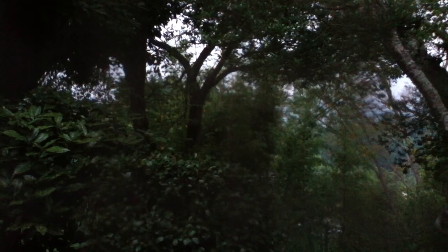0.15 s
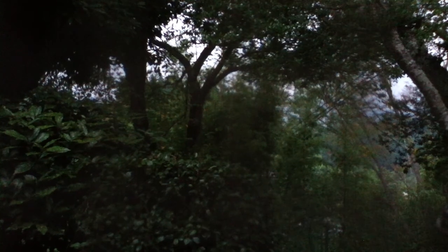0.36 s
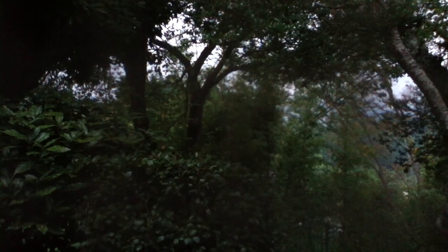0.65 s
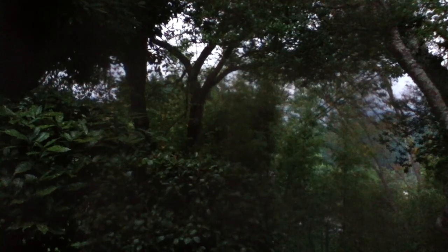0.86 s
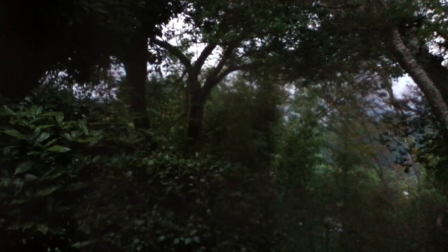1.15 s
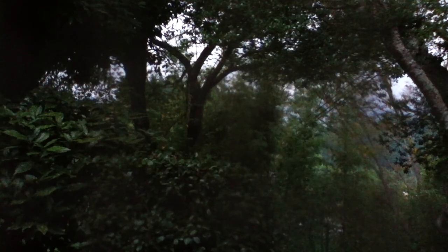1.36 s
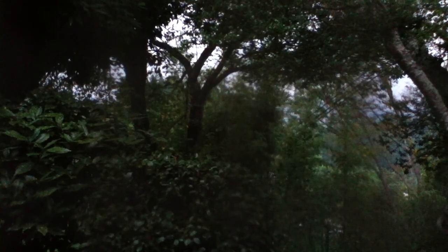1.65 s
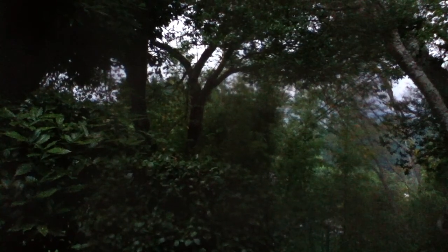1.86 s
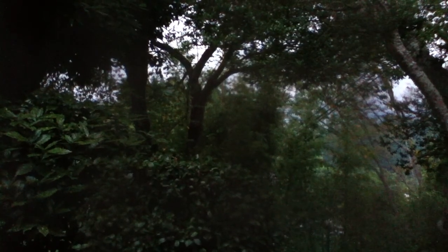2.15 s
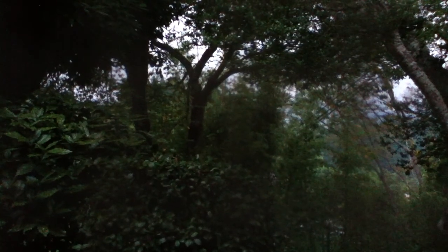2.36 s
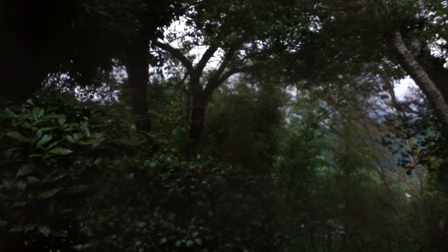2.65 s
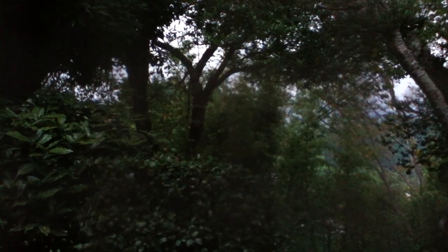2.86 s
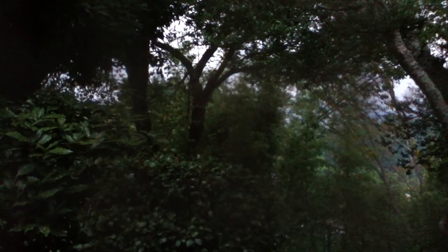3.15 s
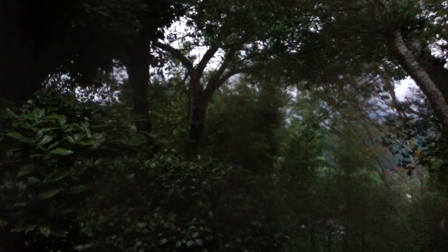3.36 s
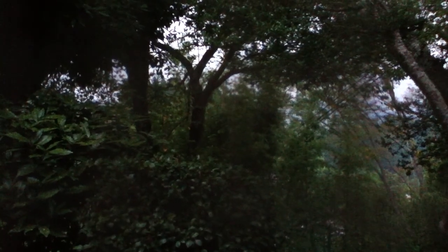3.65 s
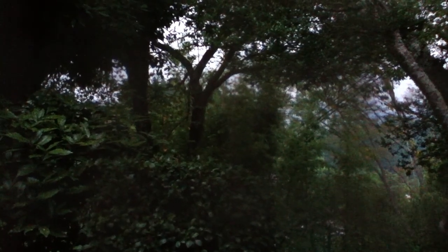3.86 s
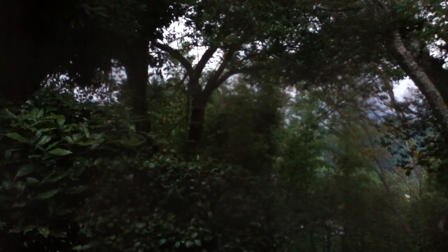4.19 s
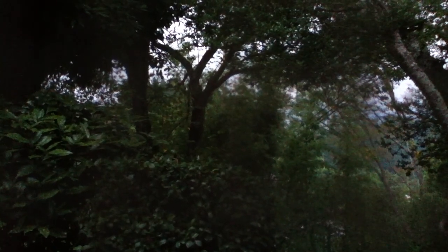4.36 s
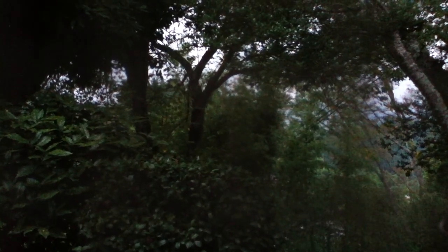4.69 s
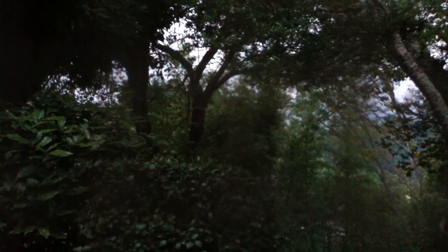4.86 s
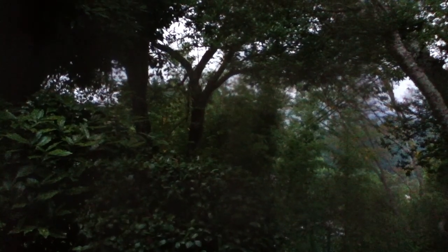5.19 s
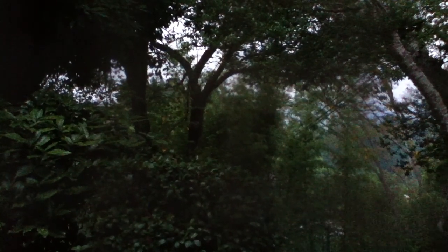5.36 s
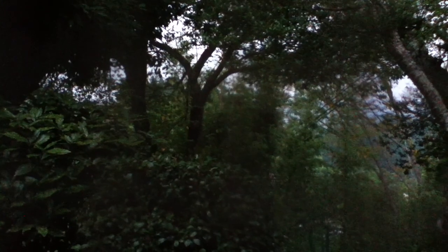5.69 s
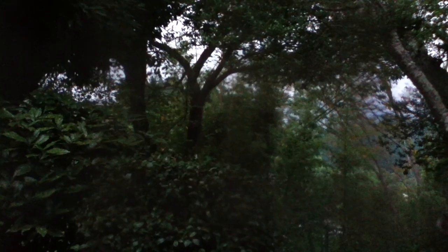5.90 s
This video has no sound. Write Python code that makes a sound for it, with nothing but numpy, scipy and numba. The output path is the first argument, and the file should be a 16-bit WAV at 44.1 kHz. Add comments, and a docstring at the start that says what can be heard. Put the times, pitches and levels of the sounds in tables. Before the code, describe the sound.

A dense, shrill insect chorus fills a shady mountain forest from 0 to 6 seconds without a break. Foremost is one near cicada, a piercing, dry metallic buzz centred near 8 kHz, made of about 407 regular clicks per second. Its tremor is slower until about 1.7 s, then quickens to a finer roughness, with another slight change of colour at 2.9 s. A crowd of similar cicadas, blurred by leaves, dips around 2.7 to 3.5 s, flickers in short swells and strengthens again at the end. Below, a far chorus holds near 4.2 kHz; nearer singers rasp briefly at 0.25, 0.7 and 1.3 s and around 2 s, then swell and climb toward 5.5 kHz. Crickets trill faintly near 2 kHz, with thin throbbing tones and a weak pulsing buzz. Two barely audible low calls pass at 4.3 and 5.4 s. Tiny chirps near 6 kHz come from 5.1 to 5.8 s. Quiet forest hush lies beneath.

```python
"""Cicada forest

One near cicada clicks about 407 times a second, its click timing shaken by a slower tremor. A crowd of its kind
shrills behind it as blurred click trains; a lower chorus of clickers climbs in pitch through moving resonances.
Crickets trill near 2 kHz as gated tones, thin insect tones throb above them, brief chirps sound near 6 kHz, a far
buzz throbs slowly and two dim low calls pass, over filtered noise for the hush of the forest."""
import sys
import numpy as np
from scipy import signal
from scipy.fft import rfft, irfft, next_fast_len
from scipy.io import wavfile
from scipy.ndimage import uniform_filter1d
from numba import njit

SR = 44100
rng = np.random.default_rng(int(sys.argv[2]) if len(sys.argv) > 2 else 0)


def wav_out(sig):
    """Save sig, one row per channel (or a flat mono array), as 16-bit PCM at SR to the path in sys.argv[1]."""
    wavfile.write(sys.argv[1], SR, np.round(np.clip(np.atleast_2d(sig).T, -1, 1) * 32767).astype(np.int16))


N = 265923
T = np.arange(N) / SR
SIZE = next_fast_len(N)
BINS_HZ = np.fft.rfftfreq(SIZE, 1 / SR)


def undb(db):
    """Decibels to amplitude ratio."""
    return 10 ** (np.asarray(db) / 20)


def unit(x):
    """Scale to rms 1."""
    return x / np.sqrt(np.mean(x ** 2))


def curves(table):
    """Interpolate each column over time; the first column is seconds."""
    s, *columns = np.vstack(table).T
    return [np.interp(T, s, c) for c in columns]


def walk(rate):
    """Random levels held 1 / rate s and slewed twice; spread 1."""
    hold = int(SR / rate)
    steps = np.repeat(rng.standard_normal(N // hold + 1), hold)
    slewed = uniform_filter1d(uniform_filter1d(steps, hold), hold)
    return unit(slewed)[:N]


def steady(x, span_s):
    """Even out swells slower than the span."""
    return x / np.sqrt(uniform_filter1d(x ** 2, int(span_s * SR)))


def bell(centre_s, half_s):
    """Gaussian swell, down to 1/e at half_s from its centre."""
    return np.exp(-((T - centre_s) / half_s) ** 2)


def colour(x, table, paths=1):
    """Filter by (Hz, dB) points, interpolated in log frequency; rms 1."""
    hz, db = np.transpose(table)
    gain = undb(np.interp(np.log(BINS_HZ + 1), np.log(hz), db, left=-60))
    return unit(irfft(rfft(x, SIZE) * gain * paths, SIZE)[:N])


@njit
def svf(x, hz, width):
    """State-variable band-pass with a moving centre, gain 1 there."""
    y, band, low = np.empty(len(x)), 0., 0.
    for i in range(len(x)):
        g, k = np.tan(np.pi * hz[i] / SR), width / hz[i]
        v = (band + g * (x[i] - low)) / (1 + g * (g + k))
        band, low, y[i] = 2 * v - band, low + 2 * g * v, k * v
    return y


def ring(x, hz, width_hz):
    """A resonance applied twice, for steep flanks."""
    hz = hz + np.zeros(N)
    return svf(svf(x, hz, float(width_hz)), hz, float(width_hz))


def clicks(cycles, jitter_us, scatter_db, shift_s=np.zeros(N)):
    """One sharp click at each whole number of the running cycle count, placed between samples."""
    at_s = np.interp(np.arange(1, int(cycles[-1])), cycles, T)
    chance = rng.standard_normal((len(at_s), 2))
    at = (at_s + np.interp(at_s, T, shift_s) + jitter_us * chance[:, 0] / 10 ** 6) * SR
    taps = np.floor(at)[:, None] + np.arange(-7, 9)
    off = taps - at[:, None]
    window = 1 + np.cos(np.pi * off / 8)
    shape = np.sinc(off) * window * undb(scatter_db * chance[:, 1:])
    return np.bincount(np.clip(taps, 0, N - 1).astype(int).ravel(), shape.ravel(), N)


def foliage(x, t60_s):
    """Leaves scatter a far sound into a short noisy tail."""
    t = T[:SR // 4]
    tail = rng.standard_normal(len(t)) * np.exp(-np.log(1000) * t / t60_s)
    return signal.fftconvolve(x, tail)[:N]


def rattle(rate_hz, jitter_us, count):
    """Slower, rougher clickers heard through the leaves; they fade in and out but the sum holds steady."""
    out = 0
    for spread in rng.uniform(-1, 1, count):
        rate = rate_hz * (1 + .1 * spread + .003 * walk(2))
        train = clicks(np.cumsum(rate) / SR, jitter_us, scatter_db=3.5)
        out = out + foliage(train, t60_s=0.064) * undb(3 * walk(2.5))
    return steady(out, 0.13)


def trills(centre_hz, spread_hz, count):
    """Each wing stroke is a short tone; many trills overlap."""
    out = 0
    for pitch, (pace, start) in zip(np.linspace(-1, 1, count), rng.uniform(-1, 1, (count, 2))):
        stroke = np.cumsum(36 * (1 + .45 * pace + 0.0453 * walk(3))) / SR + start
        gate = np.maximum(np.sin(2 * np.pi * stroke) + .9, 0)
        hz = centre_hz + spread_hz * pitch + 14 * walk(9)
        level = undb(2.2 * walk(7.7) - 4.0 * pitch ** 2)
        out = out + gate * level * np.sin(2 * np.pi * np.cumsum(hz) / SR)
    return steady(out, 0.19)


# Spectrum of the forest hush. Each row: frequency in Hz, relative density in dB per Hz.
HUSH_SPECTRUM = [(25, -14), (50, -5), (110, 1.5), (300, -2.5), (700, -10), (1500, -10.5), (2400, -7),
                 (3200, -10), (6000, -2.5), (12000, -21)]
HUSH_DB = -53


def hush():
    """Distant air and leaves: smooth noise, strongest in the bass."""
    return colour(rng.standard_normal(N), HUSH_SPECTRUM) * undb(HUSH_DB)


# Faint low calls. Each row: centre in seconds, peak level in dB, resonance in Hz.
LOW_CALL_ROWS = [(4.28, -66.5, 1220), (5.42, -67.5, 1130)]
THROB_FIRST_S, THROB_PERIOD_S, THROB_HALF_S, THROB_DB = 0.59, .725, 0.049, -58.5


def faint_voices():
    """A far insect buzzes near 3 kHz in slow regular throbs; two dim low calls ring from the same clicks."""
    # time from the nearest throb
    from_throb_s = (T - THROB_FIRST_S + THROB_PERIOD_S / 2) % THROB_PERIOD_S - THROB_PERIOD_S / 2
    buzz = rattle(120, jitter_us=120, count=3)
    out = unit(ring(buzz, 3000, 1600)) * np.exp(-(from_throb_s / THROB_HALF_S) ** 2) * undb(THROB_DB)
    for s, db, hz in LOW_CALL_ROWS:
        out = out + unit(ring(buzz, hz, 700)) * bell(s, 0.2) * undb(db)
    return out


# Spectrum of the far chorus. Each row: frequency in Hz, relative density in dB per Hz.
FAR_CHORUS_SPECTRUM = [(2200, -28), (3000, -15.5), (3550, -8.5), (3900, -3.5), (4150, 0.5), (4700, -2),
                       (5200, -7), (5700, -12.5), (7000, -30.5)]
# Climbing singers. Each row: time in seconds, level in dB, reference pitch of their resonances in Hz.
CLIMB_COURSE = [(0, -62, 4800), (1.0, -58, 4800), (1.8, -53, 4760), (2.3, -46, 4880), (2.9, -43.5, 5040),
                (3.6, -43.5, 5260), (4.3, -42, 5280), (4.7, -39.5, 5470), (6.03, -37.5, 5500)]
# Fixed narrow resonances that stay put while the singers climb. Each row: frequency in Hz, strength in dB.
FIXED_RESONANCES = [(4405, 6), (4543, 4), (4703, 6), (4862, 5), (4906, 4), (4970, 6), (5042, 5), (5114, 5),
                    (5162, 3), (5211, 5), (5288, 6), (5355, 4), (5435, 4), (5470, 5), (5582, 4), (5925, 6)]
# Early rasps of those singers. Each row: centre in seconds, peak level in dB, half length in seconds.
RASP_ROWS = [(0.25, -44, 0.041), (0.72, -41, .06), (1.304, -45.5, 0.19), (1.927, -50, 0.1),
             (2.147, -47, 0.09)]
# Lead singer among them. Each row: time in seconds, rate in clicks per second.
LEAD_RATE = [(0, 180), (3.0, 190), (4.0, 185), (4.7, 143), (5.3, 150), (6.03, 165)]
FAR_CHORUS_DB, RESONANCE_WIDTH_HZ = -45, 16
LEAD_DB, OVERTONE_DB = -3, -17  # lead against the other singers, overtone against the climbing band


def low_chorus():
    """A far chorus holds near 4.2 kHz; nearer singers rasp a few times, then swell as their resonance climbs."""
    far = colour(rattle(260, jitter_us=59, count=9), FAR_CHORUS_SPECTRUM)

    lead_cycles = np.cumsum(curves(LEAD_RATE)[0]) / SR
    lead = foliage(clicks(lead_cycles, jitter_us=45, scatter_db=1.5), t60_s=.012)
    singers = rattle(170, jitter_us=35, count=8) + unit(lead) * undb(LEAD_DB)

    climb_db, hz = curves(CLIMB_COURSE)
    # two bands in opposite sign, the lower one stronger
    climb = unit(ring(singers, hz + 120, 900)) - unit(ring(singers, hz - 480, 1050)) * undb(3.5)
    narrow = 1 + sum(undb(db) / (1 + 2j * (BINS_HZ - f) / RESONANCE_WIDTH_HZ) for f, db in FIXED_RESONANCES)
    climb = irfft(rfft(climb, SIZE) * narrow, SIZE)[:N]
    overtone = unit(ring(singers, 2.0 * hz, 3000)) * undb(OVERTONE_DB)

    rasp_level = sum(undb(db) * bell(s, half_s) for s, db, half_s in RASP_ROWS)
    rasps = unit(ring(singers, 4800, 1760)) * rasp_level
    return unit(far) * undb(FAR_CHORUS_DB) + (unit(climb) + overtone) * undb(climb_db) + rasps


# Crickets near 2.1 kHz. Each row: time in seconds, level in dB.
CRICKET_LEVEL = [(0, -54), (1.2, -55), (2.4, -57), (4.5, -55), (6.03, -55)]
CRICKET_SURGE_DB, CRICKET_SURGES_PER_S = 1.15, 8.8  # spread and rate of the random level
DEEP_CRICKETS_DB = -12.5  # against the others


def crickets():
    """A field of crickets near 2.1 kHz that surges together, and fewer, deeper ones just below."""
    main = trills(2105, 95, count=18)
    deep = trills(1870, 140, count=9)
    level_db = curves(CRICKET_LEVEL)[0] + CRICKET_SURGE_DB * walk(CRICKET_SURGES_PER_S)
    return (main + deep * undb(DEEP_CRICKETS_DB)) * undb(level_db)


# Thin high tones, long or brief. Each row: start in seconds, end in seconds, pitch in Hz,
# level before the throb in dB.
STRAND_ROWS = [(0, 2.0, 4120, -57), (1.15, 1.45, 5040, -58.5), (2.6, 6.2, 4700, -56), (4.3, 6.2, 5460, -54),
               (2.9, 3.9, 3480, -65), (2.24, 2.42, 3240, -63), (3.38, 3.5, 3200, -65),
               (4.04, 4.16, 3180, -66), (4.76, 4.9, 3220, -65), (5.8, 6.1, 3520, -63),
               (1.6, 2.4, 2730, -72), (1.95, 2.2, 4620, -55), (.3, .55, 3500, -62), (1.1, 1.5, 2620, -70),
               (.9, 1.4, 3680, -61), (1.9, 2.4, 2580, -71), (2.65, 2.95, 2520, -71), (.3, .8, 5400, -60),
               (5.6, 6.0, 3150, -67)]


def strands():
    """Thin insect tones, each wavering in pitch, throbbing about 13 times a second and fading in and out."""
    out = 0
    for start, end, hz, db in STRAND_ROWS:
        fade = np.clip(np.minimum(T - start, end - T) / 0.016, 0, 1)
        throb_cycles = np.cumsum(13 * (1 + 0.247 * walk(4))) / SR
        throb = np.maximum(np.sin(2 * np.pi * throb_cycles) + 1.8, 0) * .8 * undb(1.5 * walk(9))
        tone = np.sin(2 * np.pi * np.cumsum(hz + 18 * walk(40)) / SR)
        out = out + undb(db) * fade * throb * tone
    return out


# Short high chirps. Each row: centre in seconds, peak level before the buzz in dB, pitch in Hz.
CHIRP_ROWS = [(5.1342, -45, 5800), (5.3996, -47, 5970), (5.5588, -42, 5900), (5.7199, -43, 5950),
              (5.8122, -45, 5940)]


def chirps():
    """A lone insect adds brief notes near 6 kHz, made buzzing by a 160 Hz level modulation."""
    out = 0
    for s, db, hz in CHIRP_ROWS:
        t = T - s
        buzz = 1 + .5 * np.cos(2 * np.pi * 160 * t)
        out = out + undb(db) * bell(s, .018) * np.sin(2 * np.pi * hz * t) * buzz
    return out


# Crowd. Each row: time in seconds, level in dB, how far its band has narrowed from 0 to 1.
CROWD_COURSE = [(0, -27, 0.7), (1.68, -30, 0.34), (1.8, -30.5, 0), (2.7, -33.5, 0), (3.5, -33.5, 0.8),
                (5.2, -32.5, 0.6), (5.4, -31.5, 0.3), (6.03, -28.5, 0.8)]
# Narrowed band against the broad one. Each row: frequency in Hz, gain in dB.
CROWD_NARROWING = [(4500, -3), (6600, -3), (7200, -5), (7500, 0), (8400, 0), (8700, -6), (9800, -6),
                   (11000, -2), (16000, -2)]
# Brief swells of the crowd. Each row: centre in seconds, rise in dB.
CROWD_SURGES = [(2.25, 2), (2.95, 2), (3.38, 3), (3.64, 3), (3.77, 2.5), (4.05, 4.5), (4.4, 3), (4.62, 3),
                (4.89, 3), (5.1, 3.5), (5.93, 2)]
# Tymbal and air sac heard from afar. Each row: frequency in Hz, relative density in dB per Hz.
FAR_TYMBAL_SPECTRUM = [(4500, -84), (5700, -31), (6300, -15.5), (7000, -12.5), (7400, -1.5), (8050, 0),
                       (8600, 0.5), (9200, -5.5), (10200, -10.5), (11000, -24), (13000, -34), (16000, -100)]
SURGE_HALF_S = .05


def crowd(count=10):
    """Farther cicadas of the same kind, each at its own drifting rate, blurred by the leaves."""
    out = 0
    for spread in rng.uniform(-1, 1, count):
        rate = 414 * (1 + .006 * spread + .002 * walk(4))
        train = clicks(np.cumsum(rate) / SR, jitter_us=19.6, scatter_db=0.5)
        out = out + foliage(train, t60_s=0.024) * undb(0.62 * walk(2.1))
    level_db, core = curves(CROWD_COURSE)
    surge_db = sum(db * bell(s, SURGE_HALF_S) for s, db in CROWD_SURGES)
    broad = colour(out, FAR_TYMBAL_SPECTRUM)
    mixed = (1 - core) * broad + core * colour(broad, CROWD_NARROWING)
    return steady(mixed, 0.09) * undb(level_db + surge_db)


# Near cicada rhythm. Each row: time in seconds, rate in clicks per second, tremor in Hz.
NEAR_RHYTHM = [(0, 409, 64), (.7, 405.2, 62.5), (1.15, 405.3, 61), (1.7, 405.9, 61), (1.76, 406.4, 108.8),
               (2.15, 406.9, 107.6), (2.8, 407.65, 108.8), (3.23, 409.15, 108.5), (3.75, 409.25, 106),
               (4.43, 408.2, 105.6), (5.03, 408.45, 106), (6.03, 410.4, 105.8)]
# Near cicada level. Each row: time in seconds, level in dB.
NEAR_LEVEL = [(0.0, -29), (2.77, -26.5), (2.84, -26), (5.1, -26.5), (5.26, -27.5), (6.03, -29)]
# Its tymbal and air sac. Each row: frequency in Hz, relative density in dB per Hz.
TYMBAL_SPECTRUM = [(4500, -85), (5700, -19), (5950, -22), (6135, -14), (6330, -16.5), (6900, -3.5),
                   (7400, 2.5), (8050, 7), (8600, 2), (9200, -4), (9700, -7), (10200, -15.5),
                   (11000, -19.5), (13000, -23), (16000, -93)]
# The singer shifts on its perch between phrases. Each row: start in seconds, end in seconds, tremor swing of
# the click timing in microseconds, click sweep in ms per kHz, echoes off trunks and ground as (delay in ms, dB).
PERCH_ROWS = [(0, 1.73, 60, .8, [(5.076, -9), (3.476, -9), (11.388, -9)]),
              (1.73, 2.9, 25, -1.28, [(9.316, -7), (10.34, -10), (4.164, -10)]),
              (2.9, 6.03, 29, .3, [(6.308, -9), (9.288, -9), (4.48, -9)])]
# What else the tremor does on each perch. Each row: tilt of click colour (ratio), its lead in radians,
# strong-weak alternation from 0 to 1, its lead in radians.
TREMOR_FLEX = [(.27, -2.49, .12, -.4), (.58, 3.07, .18, .38), (1.03, 2.73, .36, .13)]


def near_cicada():
    """Very regular clicks; the tremor moves them early and late, tilts their colour and makes them alternate."""
    rate, tremor_hz = curves(NEAR_RHYTHM)
    tremor = 2 * np.pi * np.cumsum(tremor_hz) / SR
    swing_us = sum(us * ((T >= start) & (T < end)) for start, end, us, _, _ in PERCH_ROWS)
    shift_s = swing_us / 10 ** 6 * np.sin(tremor)
    train = clicks(np.cumsum(rate) / SR, jitter_us=2.5, scatter_db=.8, shift_s=shift_s)
    # raises above 8050 Hz and lowers below, or the reverse
    bright = np.tanh((BINS_HZ - 8050) / 600) * np.exp(-((BINS_HZ - 8050) / 1600) ** 4)
    out = 0
    for perch, (tilt, tilt_lead, alternate, lead) in zip(PERCH_ROWS, TREMOR_FLEX):
        start, end, _, sweep_ms, echoes = perch
        # the ribs buckle one after another, so each click sweeps in pitch: sweep_ms later for each kHz higher
        sweep = np.exp(-1j * np.pi * sweep_ms * ((BINS_HZ - 8000) / 1000) ** 2)
        paths = 1 + sum(undb(db) * np.exp(-2j * np.pi * BINS_HZ * ms / 1000) for ms, db in echoes)
        here = train * ((T >= start) & (T < end))
        tilted = irfft(rfft(here * np.sin(tremor + tilt_lead), SIZE) * bright, SIZE)[:N]
        flexed = here * (1 + alternate * np.sin(2 * tremor + lead)) + tilt * tilted
        share = (end - start) * SR / N  # keeps rms 1 within the perch
        out = out + colour(flexed, TYMBAL_SPECTRUM, sweep * paths) * np.sqrt(share)
    return out * undb(curves(NEAR_LEVEL)[0])


def scene():
    """Sum all the layers into one channel."""
    background = hush() + faint_voices() + low_chorus()
    singles = crickets() + strands() + chirps()
    return (background + singles + crowd() + near_cicada())[None]


SHELF_HZ, TOP_HZ = 10380, 14300


def record(dry):
    """The treble above SHELF_HZ is 1.5 dB weaker, and cut above TOP_HZ."""
    body = signal.sosfiltfilt(signal.ellip(6, .1, 40, SHELF_HZ, fs=SR, output="sos"), dry)
    shelved = body + undb(-1.5) * (dry - body)
    return signal.sosfilt(signal.ellip(8, .2, 70, TOP_HZ, fs=SR, output="sos"), shelved)


dry = scene()
out = record(dry)
wav_out(out)
```